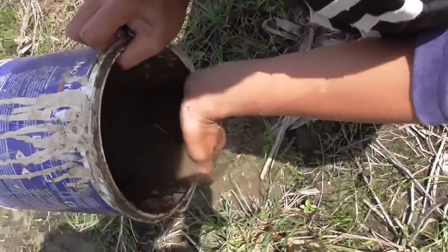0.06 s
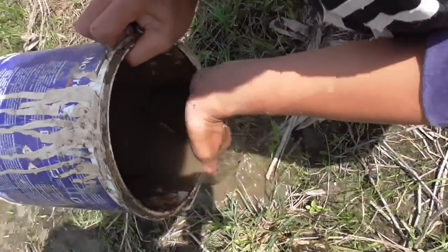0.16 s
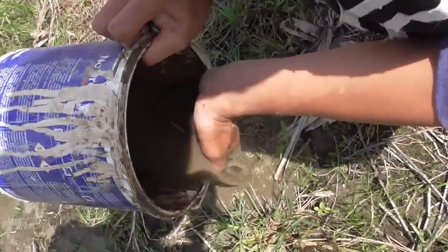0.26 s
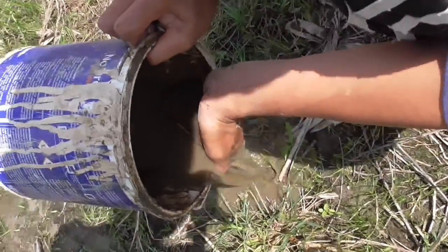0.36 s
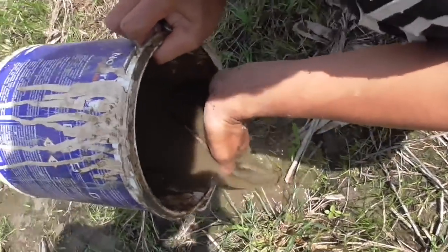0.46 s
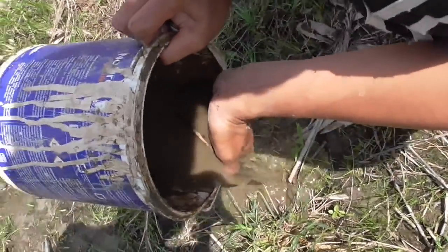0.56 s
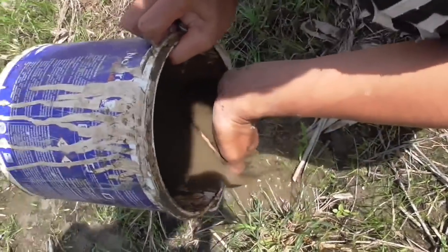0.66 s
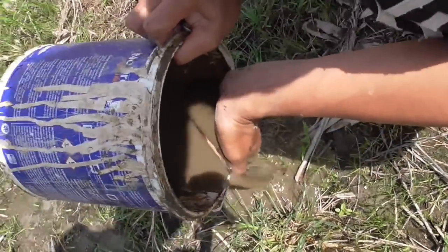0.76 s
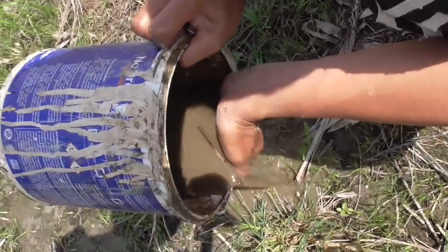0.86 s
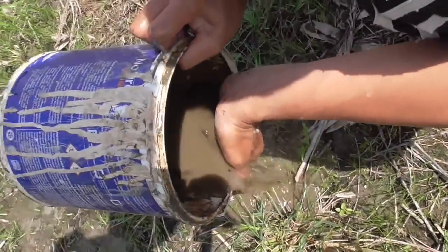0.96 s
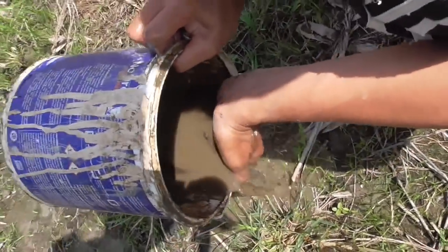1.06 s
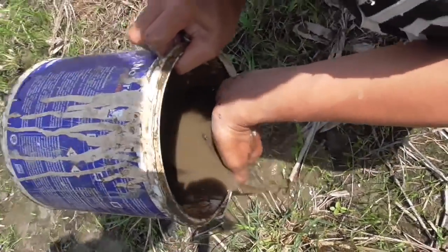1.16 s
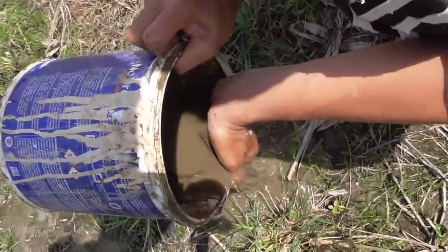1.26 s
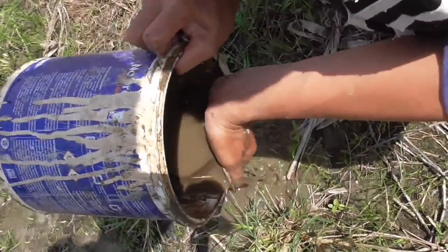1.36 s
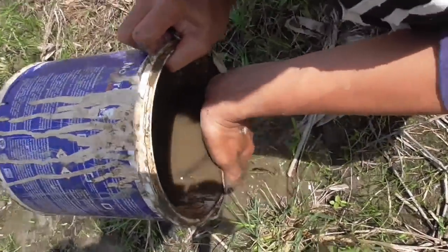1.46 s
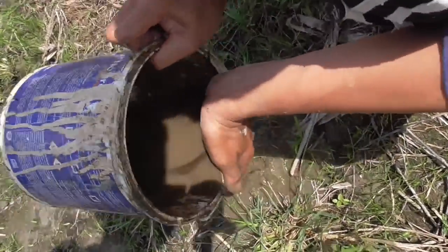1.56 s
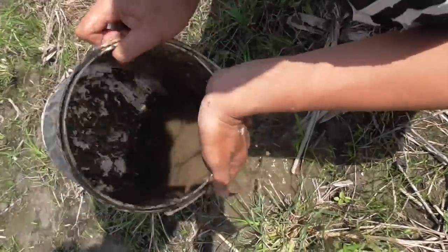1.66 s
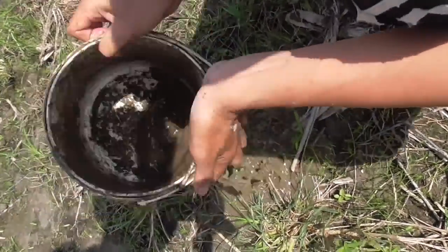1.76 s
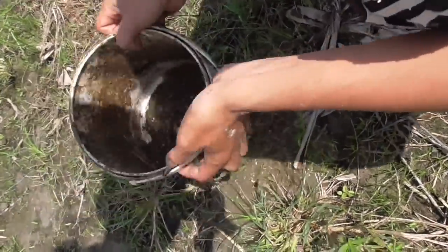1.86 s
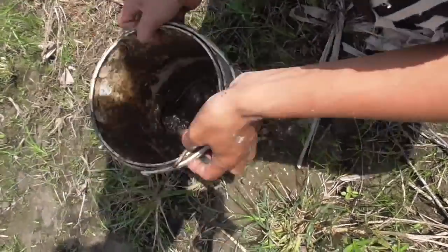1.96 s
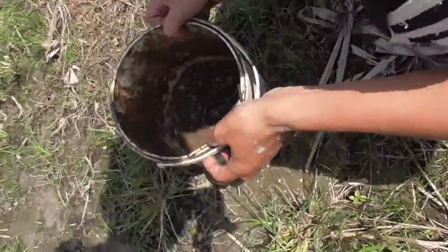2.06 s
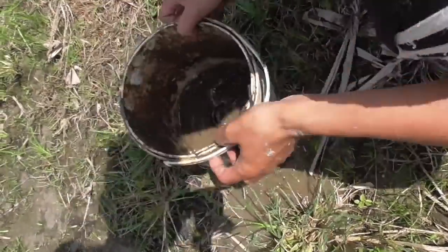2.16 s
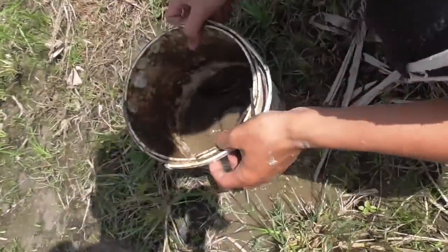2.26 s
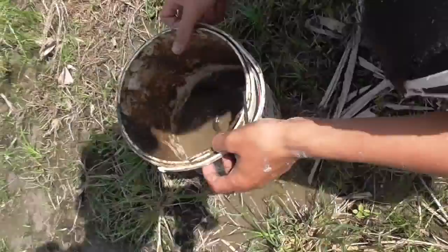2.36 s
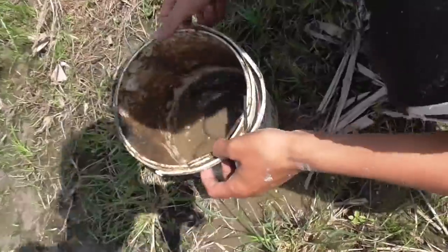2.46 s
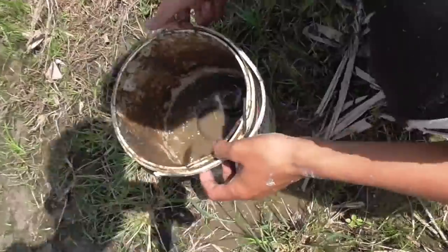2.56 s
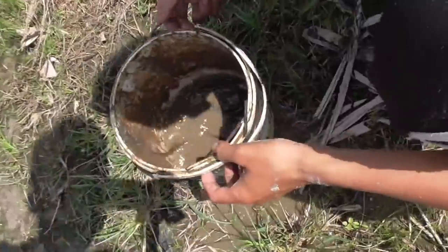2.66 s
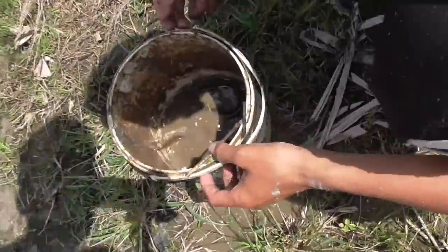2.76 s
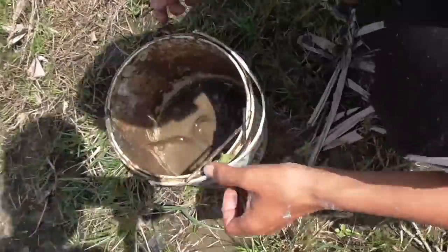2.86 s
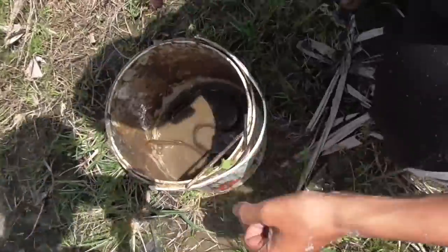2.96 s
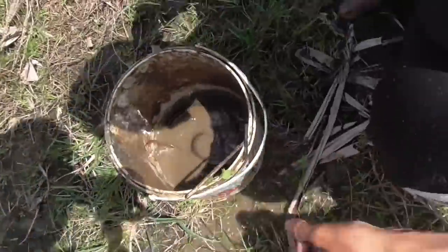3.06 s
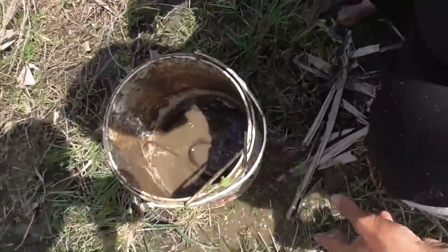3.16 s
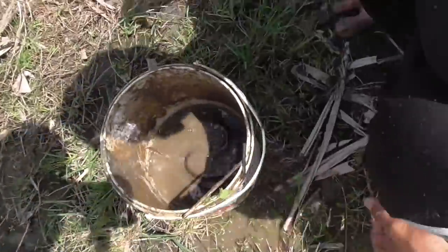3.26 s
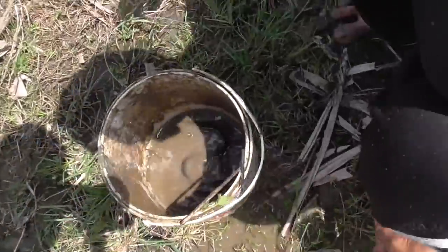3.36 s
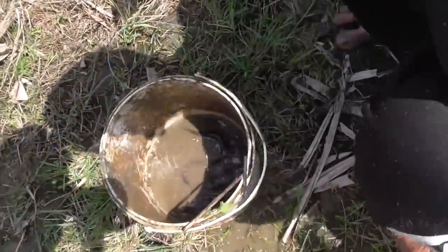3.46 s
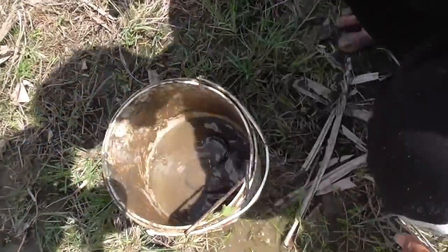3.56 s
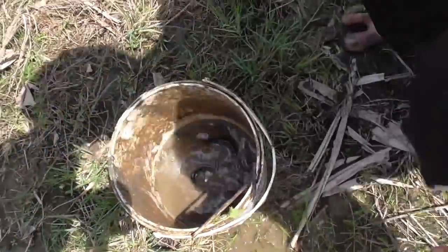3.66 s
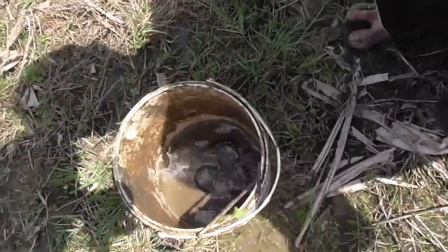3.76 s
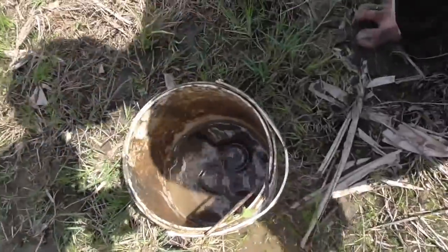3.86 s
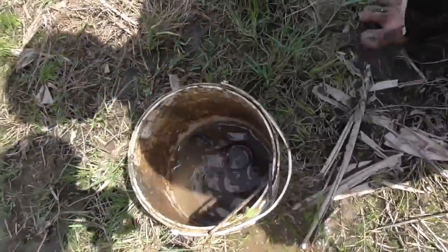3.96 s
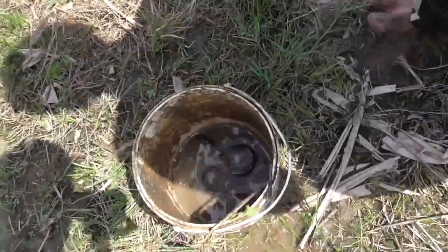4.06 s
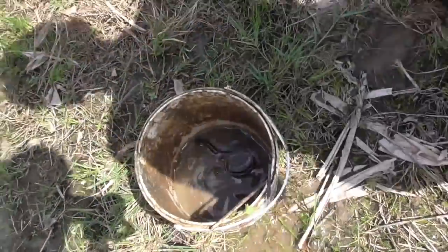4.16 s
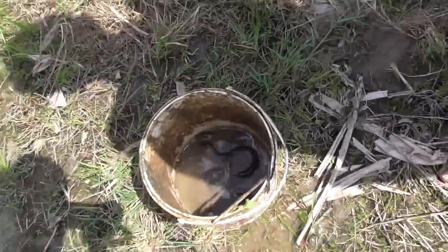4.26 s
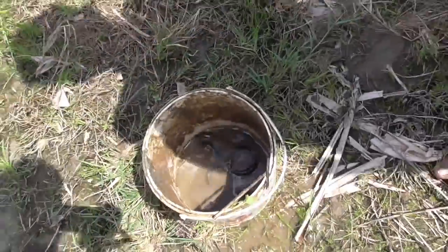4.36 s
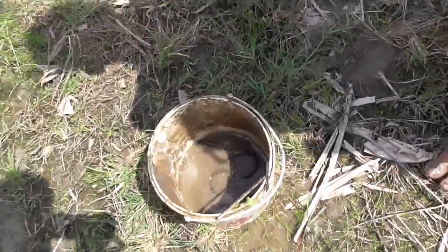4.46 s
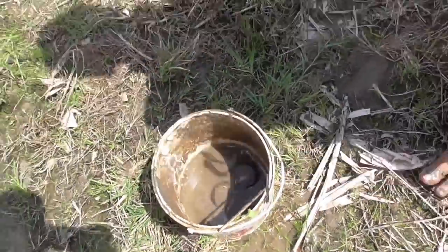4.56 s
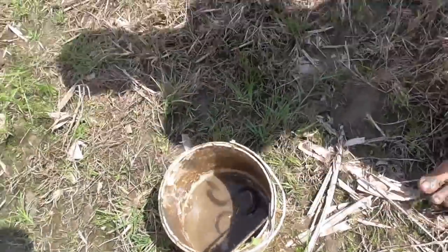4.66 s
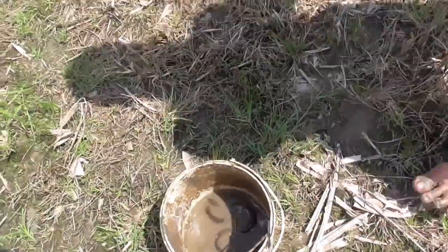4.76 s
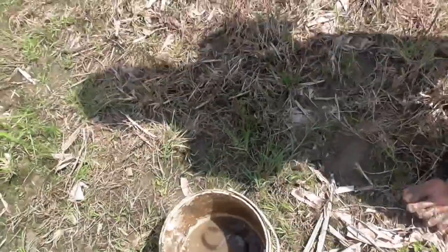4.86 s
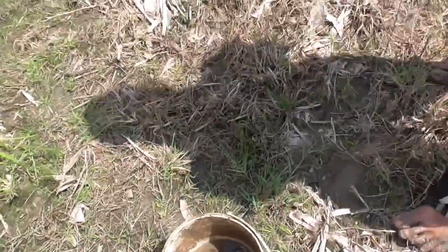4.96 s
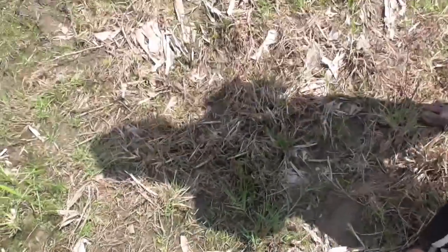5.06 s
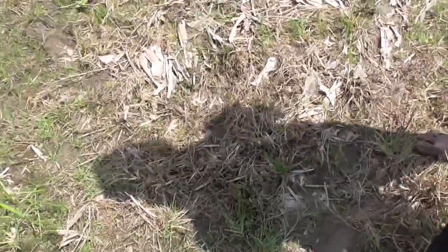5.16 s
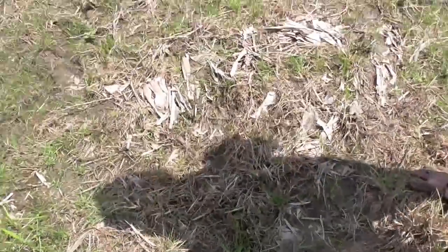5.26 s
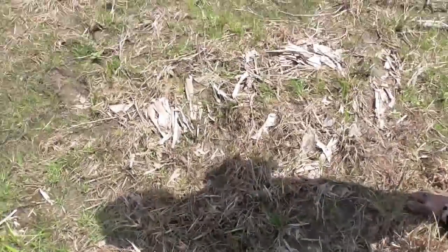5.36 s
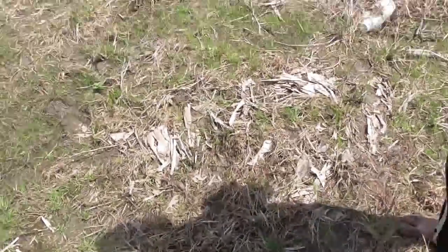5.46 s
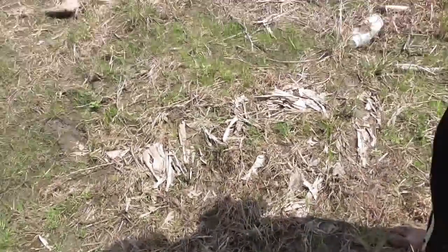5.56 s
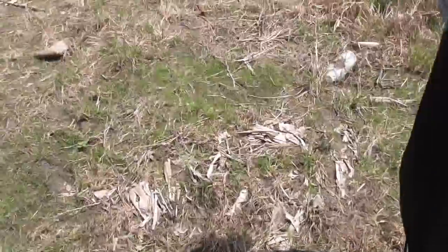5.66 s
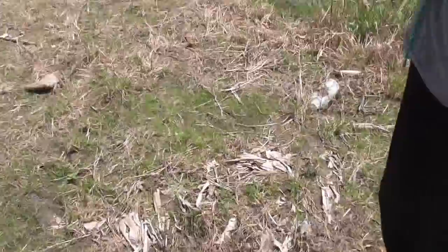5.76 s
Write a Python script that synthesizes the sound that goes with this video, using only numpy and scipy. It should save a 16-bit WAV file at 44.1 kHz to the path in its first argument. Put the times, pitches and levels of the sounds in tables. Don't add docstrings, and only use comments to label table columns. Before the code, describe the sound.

Muddy water spatters from a tipped bucket in sharp drops, breaks into dribbles and slops, then bucket knocks and dry grass rustles outdoors.

```python
import sys
import numpy as np
from scipy import signal
from scipy.io import wavfile
from scipy.ndimage import uniform_filter1d

SR = 44100
rng = np.random.default_rng(int(sys.argv[2]) if len(sys.argv) > 2 else 0)


def amplitude_ratio(level_db):
    exponent = np.asarray(level_db, float) / 20
    return 10 ** exponent


def generate_wav(sig):
    pcm = np.round(np.clip(np.atleast_2d(sig).T, -1, 1) * 32767).astype(np.int16)
    wavfile.write(sys.argv[1], SR, pcm)


N = 255780


def rms_one(x):
    return x / np.sqrt(np.mean(x ** 2) + 1e-20)


def in_time(rows):
    s, *columns = np.transpose(rows)
    return [np.interp(np.arange(N) / SR, s, column) for column in columns]


def at_hz(points, hz):
    points_hz, values = np.array(points).T
    return np.interp(np.log(hz), np.log(points_hz), values)


def sides(pan_db):
    return amplitude_ratio(np.array([[.5], [-.5]]) * pan_db)


def stereo(mid, side):
    return mid + side * [[1], [-1]]


def add(out, at_s, sound):
    i = round(at_s * SR)
    out[:, i:i + sound.shape[1]] += sound[:, :N - i]


def drift(rate_hz):
    coarse = 40
    r = np.exp(-2 * np.pi * coarse * rate_hz / SR)
    noise = rng.standard_normal(N // coarse + 2002)
    slow = signal.lfilter([1], [1, -2 * r, r * r], noise)[2000:]
    return np.interp(np.arange(N) / coarse, np.arange(len(slow)), rms_one(slow))


def resonate(x, hz, width_hz):
    r = np.exp(-np.pi * width_hz / SR)
    poles = [1, -2 * r * np.cos(2 * np.pi * hz / SR), r * r]
    return signal.lfilter(np.array([1, 0, -1]) * (1 - r * r) / 2, poles, x + 1e-18)


def resonate_twice(x, hz, width_hz, second_width_hz):
    return resonate(resonate(x, hz, width_hz), hz, second_width_hz)


def mode(t, hz, t60, rise_cycles):
    rise = (1 - np.exp(-t * hz / rise_cycles)) ** 2
    tone = np.sin(2 * np.pi * hz * t) * rise * amplitude_ratio(-60 * t / max(t60, .004))
    return tone / abs(tone).max()


def bands(spectrum, source, per_octave):
    bottom, top = spectrum[0][0], spectrum[-1][0]
    edges = bottom * 2 ** np.arange(0, np.log2(top / bottom) + 1 / per_octave, 1 / per_octave)
    for k, (low, high) in enumerate(zip(edges, np.minimum(edges[1:], .45 * SR))):
        hz = np.sqrt(low * high)
        sos = signal.butter(2, [low, high], "band", fs=SR, output="sos")
        yield hz, amplitude_ratio(at_hz(spectrum, hz)), signal.sosfilt(sos, source[k % len(source)])


def airy_noise(spectrum, likeness, patchy_db, flicker_hz, per_octave=2):
    out, together = 0, drift(flicker_hz)
    for hz, gain, (mid, side) in bands(spectrum, rng.standard_normal((2, 2, N)), per_octave):
        alike = np.clip(at_hz(likeness, hz), -1, 1)
        flicker = amplitude_ratio(patchy_db * (together + 0.41 * drift(flicker_hz)))
        out = out + gain * flicker * stereo(np.sqrt(1 + alike) * mid, np.sqrt(1 - alike) * side)
    return rms_one(out)


def grains(per_s, spread_db, wide_db, burst_s):
    length = len(per_s)
    sizes = amplitude_ratio(spread_db * np.minimum(rng.exponential(1, length), 4))
    hits = sizes * (rng.random(length) < per_s / SR)
    placed = hits * sides(wide_db * rng.standard_normal(length))
    envelope = signal.lfilter([1], [1, -np.exp(-1 / (burst_s * SR))], placed)
    mid, side = rng.standard_normal((2, length))
    return envelope * stereo(mid, 0.3 * side)


def swells(table):
    s, db, rise_s, fade_s = np.transpose(table)[:, :, None]
    late = np.arange(0, N + 64, 64) / SR - s
    tens_down = np.where(late < 0, -late / rise_s, late / fade_s)
    power = amplitude_ratio(2 * (db - 10 * tens_down)).sum(0)
    return np.interp(np.arange(N) / 64, np.arange(len(power)), np.sqrt(power))


# pitch_hz, level_db per Hz
AIR_SPECTRUM = [(15, -55), (25, -30.5), (115, -5), (149, -8), (178, 4), (213, -10.5), (536, -28),
                (629, -6.5), (724, -17.5), (1350, -23), (3000, -53.5)]
# pitch_hz, likeness (1 = mono)
OPEN_LIKENESS = [(60, 1), (180, 0.68), (550, 0.46), (1650, 0.34), (4970, 0.13), (15000, 0.024)]


def open_air():
    return amplitude_ratio(-48) * airy_noise(AIR_SPECTRUM, OPEN_LIKENESS, patchy_db=-1.13, flicker_hz=1.4)


# pitch_hz, width_hz, level_db
HUM_TONES = [
    (121.2, 11.2, -51.5),
    (149.1, 12, -54),
    (180.3, 11.2, -54),
    (240.4, 21, -58),
    (8850, 500, -59.5),
]


def hum():
    out = np.zeros((2, N))
    for hz, width_hz, db in HUM_TONES:
        mid, side = rng.standard_normal((2, N))
        out += amplitude_ratio(db) * rms_one(resonate_twice(stereo(mid, 0.27 * side), hz, width_hz, width_hz))
    return out


# pitch_hz, level_db per Hz
RUMBLE_SPECTRUM = [(150, -41), (250, -4), (354, -8.5), (496, -1.5), (557, -7.5), (953, -10), (1800, -33),
                   (2340, -69)]
# peak_s, level_db, rise_s per 10 dB, fade_s per 10 dB
HEAVES = [
    (0.05, -39, .3, .5),
    (2.02, -42, .45, 1.2),
    (2.7, -46, .5, 1.5),
    (3.6, -34, .2, .12),
    (3.8, -39.5, .2, .2),
    (4.7, -45, .6, .6),
]


def rumble():
    noise = airy_noise(RUMBLE_SPECTRUM, OPEN_LIKENESS, patchy_db=1.8, flicker_hz=15, per_octave=2.946)
    return np.hypot(amplitude_ratio(-51), swells(HEAVES)) * noise


# centre_s, length_s
LEVEL_DIPS = [
    (0.328, .012),
    (0.349, .008),
    (1.365, .014),
    (1.468, .01),
    (1.722, .014),
    (1.748, .012),
    (1.774, .016),
]


def level_dips():
    t = np.arange(0, N + 32, 32) / SR
    dip = amplitude_ratio(-9 * sum(np.exp(-(2 * (t - s) / length_s) ** 4) for s, length_s in LEVEL_DIPS))
    return np.interp(np.arange(N) / SR, t, dip)


# time_s, level_db
FIELD_LEVEL = [
    (1.8, -46),
    (2.2, -43),
    (2.67, -47.5),
    (5.8, -52),
]
# pitch_hz, level_db per Hz
HISS_SPECTRUM = [(820, -19), (1400, -1), (1680, -16.5), (2800, -4.5), (3010, -13.5), (4040, -3.5),
                 (6460, -14.5), (8590, 3), (9710, -6.5), (13500, -7), (16000, -16)]


def field_hiss(sweeps):
    stirred = amplitude_ratio(-6) * uniform_filter1d(sweeps, round(.1 * SR))
    level = np.hypot(amplitude_ratio(in_time(FIELD_LEVEL)[0]), stirred)
    noise = airy_noise(HISS_SPECTRUM, OPEN_LIKENESS, patchy_db=1.36, flicker_hz=38, per_octave=3)
    return level_dips() * level * noise


def snaps():
    bright = signal.butter(2, [3000, 13000], "band", fs=SR, output="sos")
    crackle = grains(np.full(N, 160.), spread_db=4.0, wide_db=2.0, burst_s=.0006)
    return amplitude_ratio(-11) * rms_one(signal.sosfilt(bright, crackle))


# peak_s, level_db, rise_s per 10 dB, fade_s per 10 dB
SWEEPS = [(3.34, -47, .03, .025), (3.56, -38, .15, .15), (3.62, -31, .012, .015), (3.8, -39.5, .2, .05),
          (3.98, -47, .1, .025), (4.25, -35.5, .125, .2), (4.52, -32, .14, .07), (4.62, -42, .04, .04),
          (4.69, -40, .04, .08), (4.86, -43, .02, .2), (4.97, -39, .1, .014), (5.07, -48, .03, .1),
          (5.21, -37, .015, .07), (5.26, -38, .08, .045)]
# pitch_hz, level_db per Hz
RUSTLE_SPECTRUM = [(880, -39), (1500, -12), (1830, -13), (2100, -5), (2800, -12.5), (3810, 1), (6180, -9.5),
                   (9190, 7.5), (14600, -2), (16000, -20)]
# pitch_hz, likeness (1 = mono)
GRASS_LIKENESS = [(60, 0.78), (240, 0.51), (950, 1), (3770, 0.83), (15000, -0.44)]


def grass_rustle(sweeps):
    brush = airy_noise(RUSTLE_SPECTRUM, GRASS_LIKENESS, patchy_db=1.52, flicker_hz=31)
    rustle = sweeps * (brush + snaps())
    rustle[0] = np.roll(rustle[0], 1)
    return rustle


# start_s, level_db
HANDLE_RINGS = [
    (4.735, -51),
    (4.846, -49),
    (4.97, -48),
]


def handle():
    out, t = np.zeros((2, N)), np.arange(SR) / SR
    for s, db in HANDLE_RINGS:
        add(out, s, amplitude_ratio(db) * sides(-4.5) * mode(t, hz=686, t60=1.3, rise_cycles=1.3))
    return out


def knocks(table, t60, pan_db, rattle, thud, edge=0.3):
    out, t = np.zeros((2, N)), np.arange(4000) / SR
    for s, db, hz, high_db, high_hz in table:
        noise = rng.standard_normal(len(t))
        modes = mode(t, hz, t60, rise_cycles=0.24)
        modes = modes + amplitude_ratio(high_db) * mode(t, high_hz, 0.81 * t60, rise_cycles=0.28)
        modes = modes + thud * mode(t, 0.454 * hz, t60, rise_cycles=0.33)
        shaken = noise * np.exp(-t / .016) * np.minimum(t / .004, 1)
        low, high = (resonate_twice(shaken, f, 0.53 * f, 0.75 * f) for f in (hz, high_hz))
        tail = low / abs(low).max() + amplitude_ratio(high_db - 5.5) * high / abs(high).max()
        crack = resonate(noise * np.exp(-t / .004), 3100, 2500)
        crack = edge * amplitude_ratio(np.clip(high_db, -24, 6) / 2) * crack
        add(out, s + .001, amplitude_ratio(db) * sides(pan_db) * (rattle * tail + crack - modes))
    return out


# start_s, low_db, low_hz, high_db above low, high_hz
SLOPS = [
    (1.847, -22, 420, 2, 870),
    (1.918, -30.5, 342, -6, 1330),
    (1.945, -25.5, 910, 5, 1010),
    (1.959, -31, 655, 15, 2035),
    (2.084, -31.5, 483, 13, 2250),
    (2.091, -22, 1450, 0, 1900),
    (2.095, -14, 530, -8, 958),
    (2.198, -38, 490, 14, 2160),
]
LAPS = [
    (2.275, -30, 457, -7, 1140),
    (2.329, -31, 450, -11, 1330),
    (2.498, -31, 480, -4.5, 915),
    (2.544, -21.5, 700, -19, 890),
    (2.917, -32.5, 463, -16, 1090),
]
BUMP = [
    (3.6142, -14.5, 650, 9, 1390),
    (3.6165, -17, 313, 5.5, 1050),
    (3.6198, -18.5, 620, 7.5, 1770),
    (3.6245, -17, 920, 2, 1280),
]
KNOCKS = [
    (3.968, -9, 431, -39, 910),
    (4.054, -28, 443, -23, 926),
    (4.125, -25.5, 630, -1, 1080),
    (4.607, -32, 620, -14, 980),
    (4.679, -28, 370, 1, 902),
    (4.734, -21, 700, 2, 1300),
    (4.843, -17, 682, -0.5, 1295),
    (4.969, -28, 714, -8, 950),
]


def bucket_blows():
    blows = knocks(SLOPS, t60=.025, pan_db=3.0, rattle=0.28, thud=0.18)
    blows += knocks(LAPS, t60=.04, pan_db=-6.0, rattle=0.26, thud=0.34)
    blows += knocks(BUMP, t60=.022, pan_db=-8.0, rattle=0.22, thud=0.17, edge=0.55)
    blows += knocks(KNOCKS, t60=.024, pan_db=-6.0, rattle=0.24, thud=0.22) + handle()
    blows[0] = np.roll(blows[0], 2)
    return blows


# start_s, level_db, pitch_hz
BUBBLES = [(0.2623, -28, 1170), (0.3057, -31, 1130), (0.3356, -29.5, 2160), (0.3716, -37, 2180),
           (0.415, -30, 2040), (0.4354, -32, 1180), (0.5187, -46, 1670), (0.5372, -27.5, 2100),
           (0.5965, -44, 2200), (0.6814, -32, 1150), (0.8724, -38, 1240), (1.1822, -31, 2200),
           (1.2032, -31, 2150), (1.2351, -38, 2140), (1.4366, -32.5, 2090), (1.5055, -33, 1120),
           (1.5783, -32, 1190), (1.7519, -34, 2130)]


def bubbles():
    out, t = np.zeros((2, N)), np.arange(1500) / SR
    for s, db, hz in BUBBLES:
        tone = mode(t * (1 + 3.7 * t), hz, t60=0.027, rise_cycles=1.04)
        add(out, s, amplitude_ratio(db - 2.5) * sides(-1.3) * tone)
    return out


# pitch_hz, level_db per Hz
SPATTER_SPECTRUM = [(2940, -20), (5000, -12.5), (6100, -11), (6530, -8.5), (7030, -10), (7790, 1),
                    (10200, 2), (11700, -9), (14900, -10.5), (16000, -45)]


def spatter(spatter_db, density):
    shared = grains(450.0 * density, spread_db=3.5, wide_db=6.0, burst_s=0.00056)
    draws = []
    for _ in range(4):
        own = grains(650. * density, spread_db=4.0, wide_db=5.5, burst_s=0.0004)
        draws.append(0.7 * shared + own)
    out = 0
    for hz, gain, band in bands(SPATTER_SPECTRUM, draws, per_octave=3):
        out = out + gain * sides(-.6 * max(hz - 8000, 0) / 1000) * band
    return amplitude_ratio(spatter_db) * rms_one(out)


# pitch_hz, width_hz, level_db
AIR_POCKETS = [(1195, 200, -3.5), (1600, 110, -9), (2175, 340, 0.5), (3130, 300, 0.5), (3960, 420, -1),
               (4760, 670, 5.5), (5520, 420, -2)]


def slaps(slap_db, density):
    out = 0
    for hz, width_hz, db in AIR_POCKETS:
        hits = grains(300. * density, spread_db=1.5, wide_db=0.0, burst_s=0.0013)
        out = out + amplitude_ratio(db) * rms_one(resonate_twice(hits, hz, width_hz, 2 * width_hz))
    return amplitude_ratio(slap_db) * rms_one(out)


def drops(table, burst_s, width_hz):
    out, t = np.zeros((2, N)), np.arange(-100, 500) / SR
    bright = signal.butter(4, [7300, 12200], "band", fs=SR, output="sos")
    fizz = np.exp(-abs(t) / np.where(t < 0, .0008, .002))
    shape = (t > -.0002) * np.exp(-abs(t) / burst_s) + 0.1 * fizz
    for s, db, hz, body_db in table:
        mid, side, wet, chance = rng.standard_normal((4, len(t)))
        burst = shape * stereo(mid, .4 * side)
        top = signal.sosfilt(bright, 0.3 * burst) + resonate_twice(burst, hz, width_hz, 2 * width_hz)
        body = 0
        for (pocket_hz, pocket_width, pocket_db), luck in zip(AIR_POCKETS[3:], chance[1:]):
            ring = resonate_twice(np.sqrt(shape) * wet, pocket_hz, pocket_width, 2 * pocket_width)
            body = body + amplitude_ratio(pocket_db + 4.8 * luck) * ring
        pan_db = -.9 * (hz - 7000) / 1000 + 2.0 * chance[0]
        drop = top / abs(top.mean(0)).max() + amplitude_ratio(body_db - 1.5) * body / abs(body).max()
        add(out, s + t[0], amplitude_ratio(db) * sides(pan_db) * drop)
    return out


def middling_drops():
    stream_end_s, per_s = 1.42, 45
    count = round(stream_end_s * per_s)
    place, size, pitch, body = rng.random((count, 4)).T
    s = .005 + (np.arange(count) + place) / per_s
    return np.transpose([s, -19 + 16 * (size - .5), 7500 + 5000 * pitch, -15 + 22 * (body - .5)])


def clumps(table, length, scatter_s, steady):
    spray = np.zeros(length)
    for s, db, *_ in table:
        spray[round(s * SR)] = amplitude_ratio(.3 * db)
    spray = signal.lfilter([1], [1, -np.exp(-1 / (scatter_s * SR))], spray)
    density = (steady + spray / spray.mean()) * amplitude_ratio(2.5 * drift(60)[:length])
    return density / density.mean()


# time_s, spatter_db, slap_db below spatter
POUR = [
    (0.0, -28, -10.5),
    (0.33, -31.5, -10.5),
    (0.55, -27, -12),
    (0.78, -29.5, -10.5),
    (1.25, -31.5, -10),
    (1.65, -32, -9.5),
    (1.77, -36, -11),
    (1.93, -27, -7),
    (2.06, -36.5, -7),
    (2.24, -37, -13),
]
# start_s, peak_db, brightest_hz, body_db below peak drops bursting on
STREAM_DROPS = [(0.0094, -7, 9600, -20), (0.0551, -6, 11700, -30), (0.0676, -5, 9500, -31),
                (0.075, -5.5, 7800, -31.5), (0.24, -15, 10600, -26), (0.268, -9, 11100, -16),
                (0.318, -8, 11800, -28), (0.3361, 0.5, 11500, -22), (0.3664, -11, 9000, -26),
                (0.4022, -8, 11200, -15), (0.4085, -9, 10500, -20), (0.4204, -9, 10400, -10),
                (0.4885, -10.5, 11900, -20), (0.546, -9, 9000, -29), (0.6012, -7, 7800, -20),
                (0.623, -6, 11700, -13), (0.7226, -10, 8500, -5), (0.7622, -1, 7600, -21.5),
                (0.8443, -7, 7700, -30), (0.9609, -14, 9200, -11), (1.0048, -10, 13300, -8),
                (1.0372, -8.5, 7800, -6), (1.0707, -12, 9500, -6), (1.1057, -12, 9300, -36),
                (1.1134, -6, 8300, -31), (1.2055, -7, 11300, -24), (1.2081, -6.5, 11300, -7),
                (1.215, -7, 8700, -20), (1.3806, -9, 12210, -13), (1.3846, -7, 9000, -26),
                (1.4224, -15, 11600, -12), (1.478, -7, 9600, -28), (1.5356, -20, 10900, -3),
           (1.557, 0, 7900, -27), (1.574, -14, 11900, -16), (1.6209, -13, 11700, -23),
           (1.6405, -9, 9700, -27), (1.6848, -14.5, 7700, -11.5), (1.7104, -15, 10900, -22),
           (1.7332, -1, 7900, -30), (1.7581, -12, 10900, -22), (1.7944, -16, 8400, -20),
           (1.8007, -9.5, 8700, -27), (1.8318, -13, 8100, -19), (1.853, -9, 9100, -24),
           (1.8737, -17, 8500, -15), (1.8851, 0.5, 8400, -47), (1.9236, -16, 8900, -12),
           (1.9326, -18, 10200, 3), (1.9445, -12, 8000, -3), (1.951, -14, 9000, -3), (1.958, -13, 12300, 2),
           (2.003, -12, 9400, -23), (2.049, -13, 12200, -7), (2.0815, -10, 8200, -18),
           (2.0949, -12, 9800, -19), (2.0978, -16, 12200, -6), (2.1228, -15, 11300, -17),
           (2.187, -16.5, 7500, -25), (2.1994, -25.5, 10900, 5)]
DRIPS = [(2.39, -31, 8850, -20), (2.4269, -29.5, 9990, -10), (2.4502, -26, 12200, -27),
         (2.5202, -24, 8300, -20), (2.657, -28, 11000, -14), (2.6813, -31, 8750, -27),
         (2.7696, -32, 9010, -20), (3.0235, -23.5, 11000, -36), (3.1948, -32, 8980, -22),
         (3.3487, -29, 8970, -19), (4.6726, -28, 8840, -24), (5.7094, -31, 12600, -18)]


def pour():
    pour_end = round(2.27 * SR)
    flow_db, slap_db = (curve[:pour_end] for curve in in_time(POUR))
    falling = STREAM_DROPS + list(middling_drops())
    density = clumps(falling, pour_end, scatter_s=.005, steady=1.5)
    water = drops(falling, burst_s=0.00034, width_hz=1220)
    water += drops(DRIPS, burst_s=0.00062, width_hz=1100)
    fade = np.clip((pour_end - np.arange(pour_end)) / SR * 40, 0, 1)
    add(water, 0, fade * (spatter(flow_db, density) + slaps(flow_db + slap_db, density)))
    water *= level_dips()
    lag = round(0.00103 * SR)
    water[:, lag:] += amplitude_ratio(-18) * water[:, :-lag]
    return water - .8 * resonate(water, 2570, 330)


def scene():
    sweeps = swells(SWEEPS)
    background = open_air() + hum() + rumble() + field_hiss(sweeps)
    return background + grass_rustle(sweeps) + bucket_blows() + bubbles() + pour()


def low_pass(x):
    return signal.sosfilt(signal.butter(12, 16490, fs=SR, output="sos"), x)


def record(dry):
    cut = signal.cheby2(12, 70, 16600, fs=SR, output="sos")
    mix = signal.sosfilt(cut, 1.312 * np.tanh(dry / 1.28))
    return low_pass(mix)


dry = scene()
out = record(dry)
generate_wav(out)
```